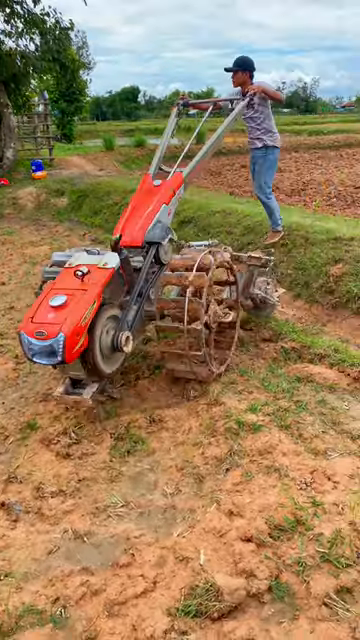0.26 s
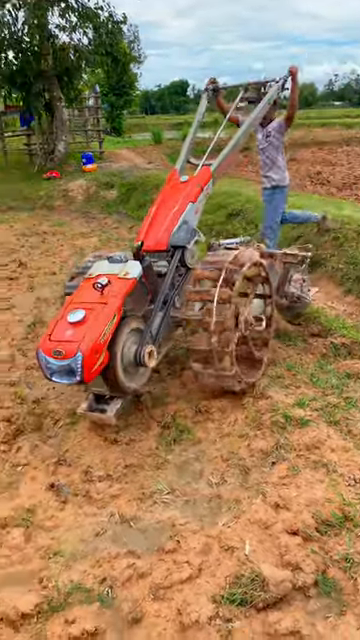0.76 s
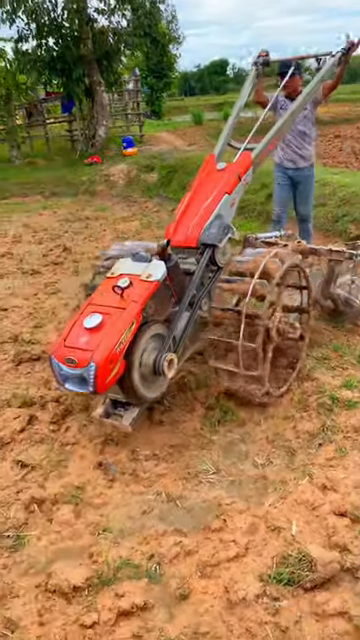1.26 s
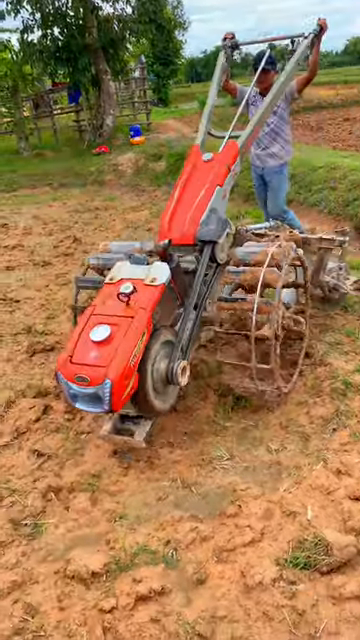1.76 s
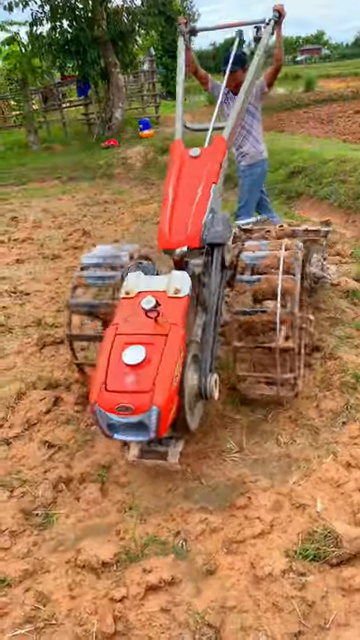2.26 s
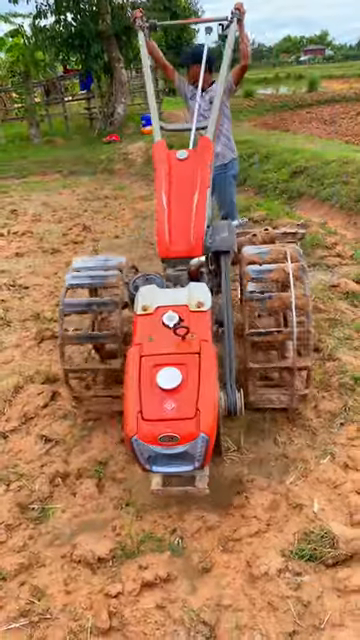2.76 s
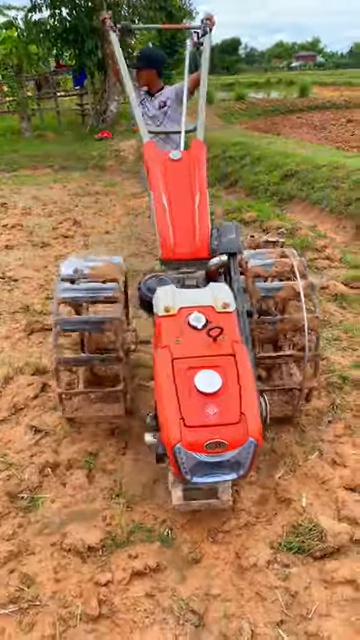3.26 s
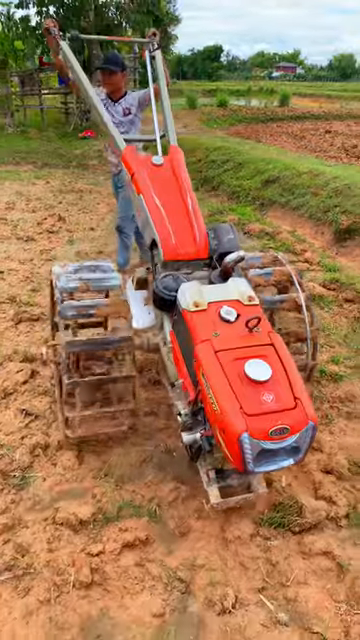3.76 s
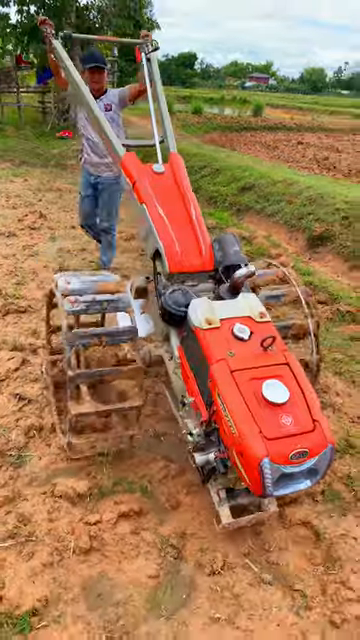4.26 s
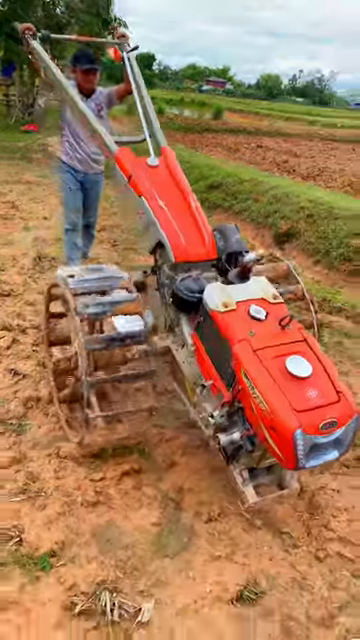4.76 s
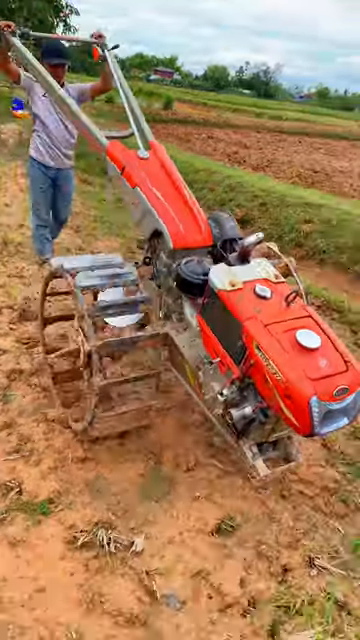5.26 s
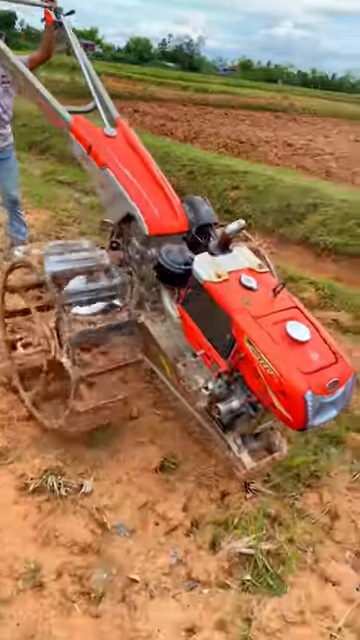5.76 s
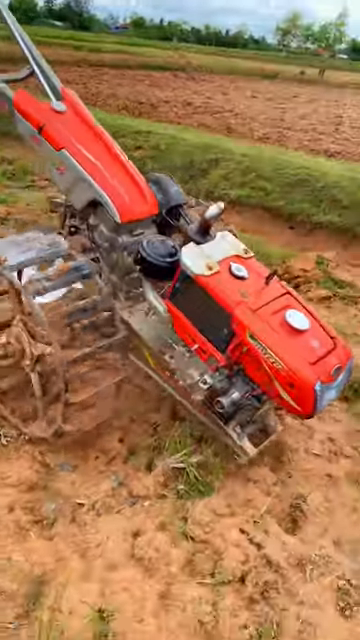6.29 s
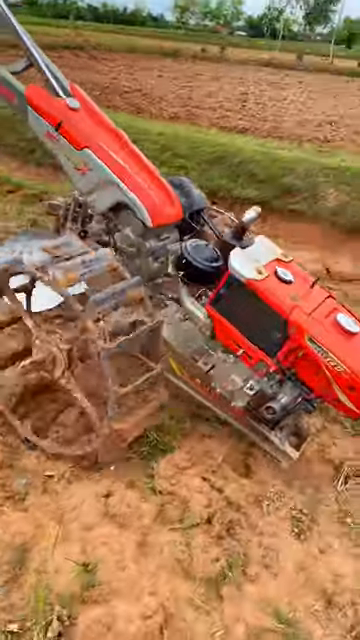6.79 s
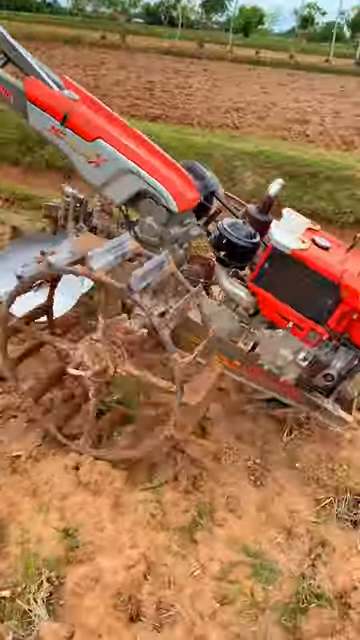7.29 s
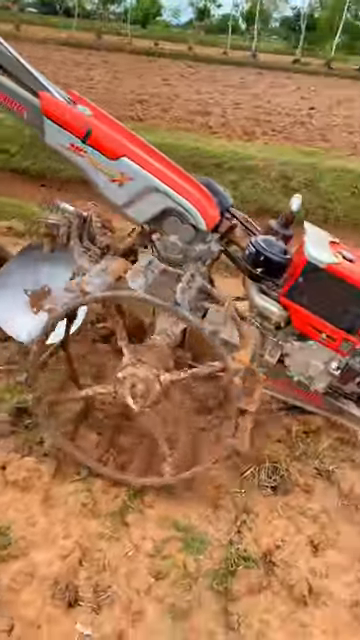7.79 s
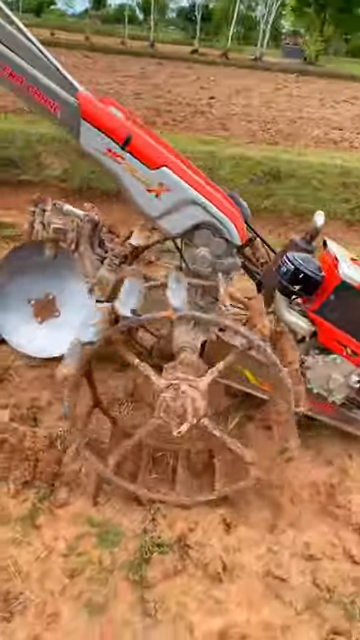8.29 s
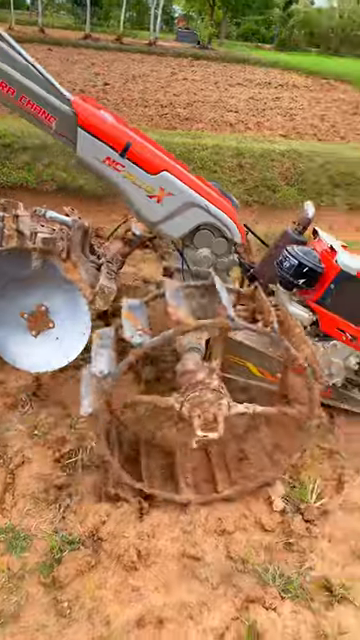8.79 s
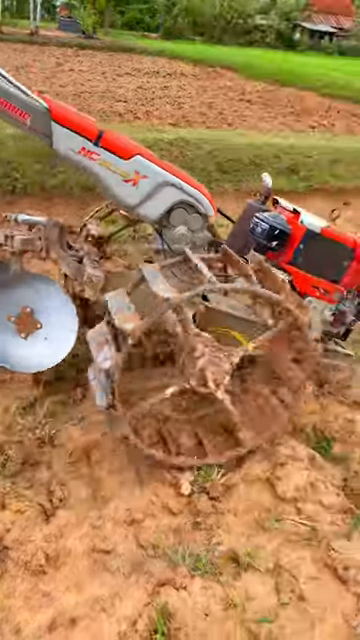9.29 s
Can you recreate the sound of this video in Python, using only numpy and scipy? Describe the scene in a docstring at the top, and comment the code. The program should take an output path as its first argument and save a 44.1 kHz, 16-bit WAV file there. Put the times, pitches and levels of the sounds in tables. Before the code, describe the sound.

A single-cylinder diesel walking tractor chugs at slow idle with rattling gears and thudding iron wheels, then revs up into fast hammering close by.

```python
"""A single-cylinder diesel walking tractor idles across a field, then revs up from about 4.7 s as it passes close by.
Each four-stroke cycle is a knock, an exhaust chuff and boom, an intake gulp and pop, and two valve ticks:
noise bursts and decaying sines timed by the crank. Gear teeth rattle at idle and fade at speed.
A thin whine swells near 1.5 s. Iron cage wheels thud and grind through clods: filtered grains, with short low pops.
The intake hum grows with the rev-up, its deep drone near top speed. Two microphone ports hear it in the open."""
import sys
import numpy as np
from scipy import signal
from scipy.fft import rfft, irfft, next_fast_len
from scipy.io import wavfile

SR = 44100
rng = np.random.default_rng(int(sys.argv[2]) if len(sys.argv) > 2 else 0)


def to_wav(s):
    """Save 16-bit WAV."""
    ch = np.atleast_2d(s).T  # columns
    pcm = np.round(np.clip(ch, -1, 1) * 32767)  # PCM
    wavfile.write(sys.argv[1], SR, pcm.astype(np.int16))


N = 420713
TIME_S = np.arange(N) / SR

# cycle_share: fraction of the cycle after firing. relative_db: scaled by a further level.
# engine speed: time_s, firings_per_s
SPEED = [(0.0, 6.795), (0.44, 6.882), (1.54, 7.059), (2.32, 6.894), (3.72, 6.887), (3.8, 6.702),
         (4.67, 6.761), (5.02, 7.195), (5.25, 7.676), (5.88, 10.27), (5.9, 10.623), (6.29, 11.438),
         (6.57, 11.51), (6.73, 12.213), (7.25, 12.647), (7.72, 12.811), (8.69, 12.604), (9.54, 12.603)]
FIRST_FIRING_S = 0.0183
# knock strength and colour: time_s, level_db, centre_hz
KNOCK_LOAD = [(0, -21.5, 1520), (.9, -20.5, 1840), (1.7, -17.5, 1880), (2.4, -19.5, 1520), (2.9, -17, 1590),
              (3.48, -19, 1920), (3.65, -16.5, 1580), (4.5, -18.5, 1490), (4.8, -12, 1570),
              (5.2, -14, 1530), (5.55, -15.5, 1530), (6.1, -11.5, 1760), (6.4, -18.5, 1690),
              (6.55, -13, 1750), (7.3, -15, 1780), (7.75, -19.5, 1700), (8.5, -19.5, 1920),
              (9.54, -18.5, 1780)]
# bangs harder or softer than the load curve: time_s, extra_db
ACCENTS = [(.02, 2.5), (.46, 2), (.6, -3), (.75, 2), (1.03, 2.5), (1.18, 0.5), (1.32, -2.5), (1.46, 1.5),
           (1.75, 0.5), (2.03, -2), (3.34, 2), (3.48, 4), (4.22, 2), (4.37, 2), (4.81, 1.5), (5.09, 0),
           (5.22, 3.5), (5.35, -1), (5.47, -1), (5.59, -2), (5.69, 0), (5.8, -2), (6.17, 0.5), (6.52, 2.5),
           (6.61, 1.5), (7.26, 2.5), (7.34, 3), (7.65, -4), (7.73, -1), (7.88, -4), (8.51, 2.5),
           (8.83, -3.5), (8.99, 2.5), (9.23, -3.5)]
# block, head and cover modes: mode_hz, width_hz, relative_db
BLOCK_MODES = [(714, 98, 1), (916.5, 66, -1.5), (1170, 300, -3.5), (1388, 79, 1), (1618, 61, -0.5),
               (1767, 40, -2.5), (1936, 140, 1.5), (2350, 120, -2.5), (3060, 110, 0), (4720, 150, 4)]
# ignition, full combustion, piston slap, rebound: relative_db each
BLOWS_DB = (-6, 0, -1.5, -5)
# crankcase wall flexing: cycle_share, mode_hz, relative_db, rise_s, decay_s
CRANKCASE_MODES = [(.002, 340, -12, 0.0006, 0.0031), (0.0079, 688, -15.5, 0.0018, 0.007),
                   (0.0075, 944, -18.5, 0.00099, 0.0042)]
# combustion crack colour: freq_hz, relative_db
CRACK_COLOUR = [(150, -21), (500, 3), (1000, -16.5), (2000, -11), (3000, 2), (3800, -5.5), (5500, -6.5),
                (8000, -12), (11500, -15.5), (16000, -29)]
CRACK_RISE_S = 0.0022
RING_DB, RASP_DB = -5.5, -3.5  # bang ring and power-stroke rasp, relative to the knock
# crankcase and fan turned toward the listener: time_s, gain_db
FLANK = [(0, 4), (2.5, 3), (4.3, 3), (5, 4.5), (6, 11), (6.7, 11), (7.25, 12), (7.9, 11), (9.54, 7)]
# engine breathing: time_s, exhaust_db, intake_db
EFFORT = [(0, -29, -59), (.8, -33.5, -55), (2.2, -29, -43), (3.25, -40, -23), (3.7, -30, -36),
          (4.55, -28, -23), (4.87, -16.5, -48), (5.2, -23, -24), (5.5, -16, -38), (5.85, -14.5, -28),
          (6.05, -17, -22), (6.38, -31, -20), (6.72, -16.5, -22), (7, -26, -18), (7.3, -28, -16),
          (7.76, -32, -14), (9.54, -29.5, -18)]
# exhaust jet colour: freq_hz, relative_db
CHUFF_COLOUR = [(100, 0), (400, 11.5), (750, 7.5), (1500, 4.5), (2200, 1.5), (3000, 5), (3800, -4),
                (5500, -8.5), (8000, -4.5), (11500, -15.5), (16000, -29)]
# muffler boom strength: time_s, level_db
BOOM_LEVEL = [(0, -35), (.8, -27), (2.45, -29), (2.66, -23.5), (3.38, -22.5), (3.55, -25), (3.8, -26),
              (3.97, -22), (4.4, -25), (4.56, -22.5), (5, -20), (5.26, -25.5), (5.39, -18.5), (5.51, -13.5),
              (5.62, -19.5), (5.72, -12), (5.82, -9.5), (5.92, -11.5), (6.1, -13), (6.37, -14.5),
              (6.45, -21), (6.72, -26), (7, -21), (7.3, -29), (7.76, -30), (9.54, -26)]
# muffler air columns: cycle_share, mode_hz, relative_db, rise_s, decay_s
MUFFLER_MODES = [(0.316, 79.8, 4, 0.019, 0.0057), (0.312, 120, -13, 0.0063, 0.0099),
                 (0.337, 53.4, -13.5, 0.014, 0.0089), (0.28, 280, -11, 0.002, 0.032)]
# exhaust shield rings: ring_hz, relative_db
SHIELD_RINGS = [(2200, 8), (3000, 4.5), (3900, -14), (5400, -16), (6400, -19)]
# intake rush colour: freq_hz, relative_db
GULP_COLOUR = [(200, 12.5), (450, 6), (750, 7.5), (1150, 8), (1600, -6), (3000, -8), (8000, -29)]
# hiss past the open intake valve: freq_hz, relative_db
SUCTION_COLOUR = [(500, 6), (1200, 0), (2800, 10), (4000, 5), (5500, 4), (8000, -24), (16000, -27)]
# intake pipe pop at valve opening: cycle_share, mode_hz, relative_db, rise_s, decay_s
INTAKE_MODES = [(.548, 323, 6.5, 0.0042, 0.0014), (.525, 191, -10.5, 0.0025, 0.032),
                (0.52, 400, -11.5, 0.0026, 0.051)]
# intake hum after valve closing: cycle_share, mode_hz, relative_db, rise_s, decay_s
HUM_MODES = [(.833, 149.8, -1.3, .0032, .056), (.85, 291.5, -5, .0019, .033), (.815, 256, -4, .0011, .0102),
             (.83, 334, -13, .002, .04), (.81, 415, -12, .002, .024)]
# air cleaner drone: cycle_share, mode_hz, relative_db, rise_s, decay_s
DRONE_MODES = [(.514, 83, 0.26, 0.0071, 0.027)]
# hum strength and timing unevenness: time_s, level_db, scatter_s
HUM_LEVEL = [(0, -52, 0.0019), (4.5, -38, .002), (5.4, -32, 0.0016), (6, -16, 0.0016), (6.6, -18.5, 0.0017),
             (6.9, -21.5, 0.0017), (7.3, -15.5, 0.00018), (7.76, -15, 0.00013), (9.54, -17, 0.0001)]
DRONE_FROM_PER_S, DRONE_FULL_PER_S = 11.5, 12.6  # firings per s
# loose-part clatter colour: freq_hz, relative_db
CLATTER_COLOUR = [(100, -55), (500, -3), (780, -2.5), (910, 1.5), (1050, 4), (1700, -1), (2100, 4.5),
                  (2650, -2.5), (3700, -16), (5200, -22), (7000, -12), (11500, -20), (16000, -29)]
CLATTER_DB, CLATTER_DB_PER_KNOCK_DB, REFERENCE_KNOCK_DB = -27.5, 0.67, -17
CLATTER_BETWEEN = .48  # steady gain between power strokes
JOLT_UNEVEN_DB = 2  # spread from one power stroke to the next
# guards, rods, brackets: ring_hz, relative_db
FITTING_RINGS = [(750, -1.5), (950, 1.5), (1400, 6), (1900, 0.5), (2700, 5.5), (3200, -2.5), (3800, -7),
                 (5500, -6)]
CLINKS_PER_S = 14  # per fitting
# valves snapping shut: cycle_share, level_db, decay_s
VALVES = [(.475, -32, 0.0063), (0.765, -29, 0.0041)]
# valve tick colour: freq_hz, relative_db
TICK_COLOUR = [(400, 19.5), (1000, 20), (3000, 4), (5000, 9), (7000, 7), (10000, 8), (12000, 4),
               (16000, -7)]
# rocker cover tapped at intake opening: cycle_share, mode_hz, relative_db, rise_s, decay_s
ROCKER_MODES = [(.527, 900, -31, 0.00068, 0.00093), (.527, 1130, -24.5, 0.0003, 0.0021),
                (.53, 765, -30, 0.00079, 0.004)]
# gear rattle colour: freq_hz, relative_db
GEAR_COLOUR = [(1000, 11), (3500, -1.5), (6000, 1), (8500, 2), (9900, 4.5), (10180, 7), (10500, -1),
               (11600, 5.5), (12600, 3), (16000, -7)]
# rattle level, firings per s where it starts to fade, dB lost per further firing per s
RATTLE_DB, TIGHT_PER_S, RATTLE_FADE_DB = -27.5, 10.53, 13
# faint thin whine: peak_s, gaussian_sigma_s, level_db
WHINE = (1.5, .5, -48)
# singing thin panels: mode_hz, width_hz, level_db
PANEL_MODES = [(900, 54, -40.5), (2590, 95, -42.5)]
# wheels striking clods: start_s, peak_db, centre_hz
CLODS = [(0.128, -13, 80.7), (0.166, -12, 143), (0.365, -24, 163), (1.272, -15, 80), (1.347, -19, 95),
         (1.819, -10, 81), (1.848, -19, 80.7), (2.15, -16, 182), (2.37, -18, 110), (2.304, -13, 159),
         (2.483, -15, 201), (2.903, -28, 870), (3.08, -19, 96.9), (3.191, -8, 844), (3.219, -29, 89),
         (3.29, -22, 102), (3.329, -22, 83.4), (4.25, -32, 98.5), (4.366, -20, 80.7), (6.348, -10.5, 142),
         (6.626, -7, 235), (6.66, -12.5, 278), (7.346, -13, 151), (7.965, -8.5, 72)]
# wheels churning soil: time_s, level_db
SOIL_LEVEL = [(0, -27), (.6, -30.5), (1.3, -27), (1.6, -29.5), (2.15, -25), (2.5, -32.5), (3.25, -25),
              (3.7, -32.5), (4.3, -27), (4.5, -25), (4.78, -29), (5.5, -32.5), (6.1, -28.5), (6.62, -24.5),
              (6.8, -40), (8.1, -36), (8.33, -29), (8.5, -33), (9.54, -36)]
# churned soil colour: freq_hz, relative_db
EARTH_COLOUR = [(20, -18), (55, 1.5), (100, 7), (170, 1), (250, -2), (450, -9.5), (800, -22.5),
                (1500, -14.5), (5000, -47)]
# slats crumbling crust: start_s, length_s, relative_db
CRUMBLES = [(0.1, 0.1, -26.5), (0.366, 0.035, -32), (0.653, 0.048, -30), (1.055, 0.2, -30),
            (1.506, 0.39, -36), (1.763, 0.058, -30), (1.9, 0.36, -32.5), (2.322, 0.037, -31),
            (2.573, 0.26, -30.5), (2.897, 0.019, -18.5), (3.063, 0.035, -23.5), (3.172, 0.18, -23),
            (3.508, 0.026, -29), (3.917, .22, -29.5), (4.24, 0.082, -26)]
# crumbling crust colour: freq_hz, relative_db
CRUMBLE_COLOUR = [(60, -24), (200, -5.5), (400, 1.5), (650, -0.5), (1000, -1.5), (1600, -15), (5000, -38)]
CRUMBLE_RISE_S, CRUMBLE_DECAY_S = 0.0053, 0.021
# frame shudder as a wheel drops into a rut: start_s, relative_db
JOLTS = [(.12, -44), (.27, -32), (1.03, -37), (1.26, -29), (1.5, -36), (1.79, -33), (2.12, -21.5),
         (3.93, -34), (4.23, -23), (4.33, -23), (4.54, -29), (4.72, -48), (5.75, -23), (7.02, -40),
         (7.35, -29), (7.92, -25), (8.22, -25)]
JOLT_RISE_S, JOLT_DECAY_S = 0.036, 0.059
# frame rumble colour: freq_hz, relative_db
RUMBLE_COLOUR = [(10, -30), (28, -29), (48, -7), (75, -13), (130, -20), (400, -17), (2000, -65)]
# short low pops: clods snapping, and the low body of two hard knocks near 4.2-4.4 s:
# start_s, relative_db, base_hz (scaled by the falling pitch)
LOW_POPS = [(.102, -17, 500), (.371, -19, 486), (.4, -17, 730), (.448, -16, 900), (.677, -18, 725),
            (.705, -24, 950), (1.163, -24, 576), (1.222, -22, 560), (1.278, -16, 654), (1.773, -19, 1130),
            (1.823, -11.5, 400), (2.157, -18, 557), (2.181, -15, 375), (3.09, -16, 605),
            (3.267, -12.5, 880), (4.222, -15, 613), (4.373, -17, 546), (6.63, -29, 487)]
# wheel grinding into packing soil: start_s, length_s, level_db, from_hz, to_hz
GRINDS = [(1.15, 0.14, -47, 260, 617), (2.037, 0.2, -31, 168, 418), (3.08, 0.26, -45, 258, 800),
          (5.85, 0.4, -31, 190, 334), (6.3, 0.43, -26, 137, 270), (6.594, 0.115, -26.5, 225, 290),
          (6.59, 0.14, -29, 360, 440), (6.753, 0.62, -27, 274, 312)]
# fan hiss colour: freq_hz, relative_db
FAN_COLOUR = [(250, -5), (600, 2), (1100, 12), (3000, 1.5), (4400, 0.5), (5300, 2), (6300, -7), (8000, -11),
              (11500, -8.5), (16000, -28)]
# inter-port phase: freq_hz, left_lead_rad
PORT_PHASE = [(100, 0), (2000, .1), (3400, .85), (5200, .3), (6000, 1.6), (6600, 2.9), (7900, 3.35),
              (9000, 4.9), (9800, 6.2), (11000, 6.35), (12000, 8), (12600, 9.2), (14200, 9.55),
              (15500, 12.2)]
# inter-port likeness: freq_hz, likeness_0_to_1
PORT_LIKENESS = [(250, 0.88), (550, 0.74), (900, 0.94), (2000, 0.91), (2500, 0.74), (4300, 0.49),
                 (5300, 0.86), (6100, 0.95), (7200, 1), (8700, 1), (10300, 0.92), (12200, 0.78),
                 (13300, .98), (15000, 0.71)]
# inter-port balance: freq_hz, left_minus_right_db
PORT_BALANCE = [(100, 0), (300, -.8), (700, 2.4), (1300, 2.4), (2400, -1.3), (5000, 0)]
EDGE_HZ = 15850  # upper band limit


def knock(crack_db=-9, tail_db=-15, focus_hz=480, slap_s=0.0022, low_hz=1200, wander_hz=35, case_db=0):
    """Each firing bangs the block and flexes the crankcase; the block buzzes on through the power stroke."""
    fire_s = moments(0)
    wander = rng.standard_normal(len(fire_s))
    fire_db = np.interp(fire_s, TIME_S, along(KNOCK_LOAD))
    for accent_s, extra_db in ACCENTS:
        fire_db[np.argmin(abs(fire_s - accent_s))] += extra_db
    centre_hz = np.interp(fire_s, TIME_S, along(KNOCK_LOAD, column=2)) + wander_hz * wander
    # each bang favours modes near its centre; low modes radiate from the flank
    flank = np.interp(fire_s, TIME_S, level(FLANK))
    weights = []
    for hz, _, mode_db in BLOCK_MODES:
        facing = flank if hz < low_hz else 1
        weights.append(amp(mode_db) * facing / (1 + ((hz - centre_hz) / focus_hz) ** 2))
    weights = np.array(weights)
    weights /= np.linalg.norm(weights, axis=0)

    last = latest(fire_s)
    cycles_since_fire = (TIME_S - fire_s[last]) * along(SPEED)
    buzz = amp(tail_db) * level(KNOCK_LOAD) * swell(cycles_since_fire, rise=0.11, decay=0.32)
    case_gain = amp(case_db) * level(KNOCK_LOAD) * np.sqrt(level(FLANK))
    ring = pulsed_modes(CRANKCASE_MODES, case_gain, uneven_db=0.5)
    for start_s, bang_db, shares in zip(fire_s, fire_db, weights.T):
        add(ring, start_s, amp(RING_DB + bang_db) * bang(shares, slap_s))
    for weight, (hz, width_hz, _) in zip(weights, BLOCK_MODES):
        ring += resonate(weight[last] * buzz * grit(1500, 0.53), hz, 2.3 * width_hz)
    t = np.arange(SR // 8) / SR
    blow = strike(fire_s, amp(fire_db), swell(t, CRACK_RISE_S, decay=0.0095)) + amp(RASP_DB) * buzz
    return ring + amp(crack_db) * coloured(blow * grit(12000, 0.24), CRACK_COLOUR)


def bang(weights, gap_s, uneven_db=1.1, detune=0.022):
    """Ignition, combustion, piston slap and rebound ring the block modes; rms 1."""
    t, out = np.arange(SR // 25) / SR, np.zeros(SR // 25)
    for k, (weight, (hz, width_hz, _)) in enumerate(zip(weights, BLOCK_MODES)):
        envelope = (-1) ** k * weight * swell(t, rise=0.0002, decay=1.55 / (np.pi * width_hz))
        for blows_before, blow_db in enumerate(BLOWS_DB):
            late, strength, off = rng.standard_normal(3)
            tone = np.sin(2 * np.pi * hz * (1 + detune * off) * t)
            start_s = gap_s * blows_before * (1 + .12 * late)
            add(out, start_s, amp(blow_db + uneven_db * strength) * envelope * tone)
    return unit(out)


def chuff(jet_db=0.0, wash_db=-11):
    """The exhaust valve cracks open on a short turbulent jet, over a weaker, slower wash of gas."""
    jet = bursts(0.245, rise=0.004, decay=0.0055, uneven_db=1.5)
    wash = amp(wash_db) * bursts(0.14, rise=0.011, decay=0.028, uneven_db=3.0)
    return amp(jet_db) * level(EFFORT) * coloured((jet + wash) * grit(7000, 1.0), CHUFF_COLOUR)


def muffler():
    """Each blowdown rings the muffler's air columns."""
    return pulsed_modes(MUFFLER_MODES, level(BOOM_LEVEL), uneven_db=0.0)


def shield(rattle_db=-12, share=0.26, spread=.03, decay_s=0.0025, uneven_db=0.0, count=6):
    """Each blowdown shakes the exhaust shield: a few hard taps, each on different rings."""
    t, out = np.arange(SR // 40) / SR, np.zeros(N)
    force, speed = level(EFFORT), along(SPEED)
    low_hz, high_hz = SHIELD_RINGS[0][0], SHIELD_RINGS[-1][0]
    for s in moments(share):
        size = np.interp(s, TIME_S, force) * amp(rattle_db + uneven_db * rng.standard_normal())
        for late_s in spread * rng.exponential(1.5, count) / np.interp(s, TIME_S, speed):
            hz = low_hz * (high_hz / low_hz) ** rng.random(size=3)
            tones = amp(read(SHIELD_RINGS, hz)) @ np.sin(2 * np.pi * hz[:, None] * t)
            add(out, s + late_s, size * swell(t, rise=0.0007, decay=decay_s) * tones)
    return out


def gulp(rush_db=-4, hiss_db=-36):
    """Air rushes into the cylinder as the intake valve opens, then hisses past it."""
    rush = bursts(0.492, rise=0.00097, decay=0.012, uneven_db=2.5) * grit(12000, 0.82)
    hiss = bursts(0.563, rise=0.002, decay=0.006, uneven_db=6.5) * grit(17000, 0.72)
    rush = amp(rush_db) * level(EFFORT, column=2) * coloured(rush, GULP_COLOUR)
    return rush + amp(hiss_db) * np.sqrt(level(FLANK)) * coloured(hiss, SUCTION_COLOUR)


def intake_pipe():
    """The pipe pops at valve opening and hums after closing; the air cleaner drones near top speed."""
    pop = pulsed_modes(INTAKE_MODES, level(EFFORT, column=2), uneven_db=0.1, scatter_s=.00005)
    hum_gain = level(HUM_LEVEL)
    drone_gain = hum_gain * np.interp(along(SPEED), [DRONE_FROM_PER_S, DRONE_FULL_PER_S], [0, 1])
    drone = pulsed_modes(DRONE_MODES, drone_gain, uneven_db=0.5)
    scatter_s = abs(along(HUM_LEVEL, column=2))
    return pop + drone + pulsed_modes(HUM_MODES, hum_gain, uneven_db=1.0, scatter_s=scatter_s)


def clatter(throb=0.95, second_db=-8, dry_db=-7, ring_db=-5):
    """Loose parts jolted twice a cycle ring the block and its fittings."""
    first = throb * bursts(0.037, rise=0.0042, decay=0.03, uneven_db=JOLT_UNEVEN_DB)
    second = amp(second_db) * bursts(0.65, rise=0.0016, decay=0.0048, uneven_db=0.5)
    jolts = CLATTER_BETWEEN + first + second
    # separate impacts per mode; 1 / hz favours the low ones
    ringing = sum(amp(db) / hz * resonate(grit(260, 2.0), hz, width_hz) for hz, width_hz, db in BLOCK_MODES)
    shaking = amp(CLATTER_DB + CLATTER_DB_PER_KNOCK_DB * (along(KNOCK_LOAD) - REFERENCE_KNOCK_DB))
    dry_hits = amp(dry_db) * coloured(grit(600, 0.83), CLATTER_COLOUR)
    return thin(shaking * jolts * (dry_hits + amp(ring_db) * unit(ringing) + clinks()), edge_hz=527)


def clinks(count=36, clink_db=-3.5, spread_db=2.1, width_hz=55):
    """Many small fittings, each with its own short ring, knocked at random."""
    pitches_hz = np.geomspace(FITTING_RINGS[0][0], FITTING_RINGS[-1][0], count)
    pitches_hz = pitches_hz * (1 + 0.012 * rng.standard_normal(count))
    hits, out = CLINKS_PER_S * N // SR, np.zeros(N)
    for hz in pitches_hz:
        taps = np.zeros(N)
        taps[rng.integers(0, N, hits)] = amp(spread_db * np.minimum(rng.exponential(1, hits), 4))
        out += amp(read(FITTING_RINGS, hz)) * resonate(taps, hz, width_hz)
    return amp(clink_db) * unit(out)


def valve_ticks():
    """Valves snap onto their seats twice a cycle: noise bursts through a bright ring."""
    ticks = sum(amp(db) * bursts(share, rise=0.0044, decay=decay, uneven_db=3.0) for share, db, decay in VALVES)
    ring = bright_ring(count=60, low_hz=710, high_hz=15060, decay_s=0.0016)
    return coloured(signal.oaconvolve(ticks * grit(9000, 0.25), ring)[:N], TICK_COLOUR)


def rocker_cover():
    """The intake valve's opening taps the cover into a brief ring."""
    return pulsed_modes(ROCKER_MODES, np.sqrt(level(FLANK)), uneven_db=2.5, scatter_s=0.00013)


def gears(click_db=-4, ring_db=-3):
    """Power strokes jerk slack gear teeth into chatter, with an added bright ring; drive at speed pulls them tight."""
    backlash = bursts(0.087, rise=0.0013, decay=0.0066, uneven_db=1.0)
    backlash = backlash + bursts(0.14, rise=0.0083, decay=0.014, uneven_db=3.0)
    slack = amp(RATTLE_DB - RATTLE_FADE_DB * np.maximum(along(SPEED) - TIGHT_PER_S, 0))
    clicks = backlash * grit(1100, 1.2)
    ringing = signal.oaconvolve(clicks, bright_ring())[:N]
    return slack * coloured(amp(click_db) * clicks + amp(ring_db) * ringing, GEAR_COLOUR)


def bright_ring(count=44, low_hz=2400, high_hz=12500, decay_s=0.0022):
    """Brief bright ring of many close high modes, added to rattle and ticks; unit energy."""
    t = np.arange(SR // 40) / SR
    hz = np.linspace(low_hz, high_hz, count) + 70 * rng.standard_normal(count)
    turns = hz[:, None] * t + rng.random((count, 1))
    ring = np.exp(-t / decay_s) * np.sin(2 * np.pi * turns).sum(0)
    return ring / np.linalg.norm(ring)


def whine(whine_hz=4500):
    """Noise through two narrow resonances swells and fades once."""
    peak_s, sigma_s, whine_db = WHINE
    tone = resonate(resonate(rng.standard_normal(N), whine_hz, 150), whine_hz, 220)
    return amp(whine_db) * np.exp(-((TIME_S - peak_s) / sigma_s) ** 2 / 2) * unit(tone)


def panels(throb=1.2):
    """Thin panels ring under steady shaking that grows at each power stroke."""
    shake = 5 + throb * bursts(0.073, rise=.006, decay=0.034, uneven_db=6.0)
    shake = shake * lumps(per_s=2.75, depth_db=0.5)
    out = np.zeros(N)
    for hz, width_hz, db in PANEL_MODES:
        out += amp(db) * unit(resonate(resonate(shake * grit(400, 1.7), hz, width_hz), hz, 5 * width_hz))
    return out


def clod_thuds(thud_db=-6):
    """Iron slats thud on clods: short noise pushes around one low pitch."""
    out, t = np.zeros(N), np.arange(SR // 5) / SR
    for start_s, peak_db, hz in CLODS:
        push = rng.standard_normal(len(t)) * swell(t, rise=0.00097, decay=0.016)
        colour = [(30, -18), (hz / 3, -4), (hz, 0), (hz * 2.13, -9), (hz * 8, -30), (16000, -55)]
        thud = coloured(push, colour)
        add(out, start_s, amp(peak_db + thud_db) * 2 * thud / abs(thud).max())
    return out


def low_pops(pop_db=-1, fall=1.48, pop_s=0.00326):
    """Short low pops of falling pitch: clods snapping, and the low body of two hard knocks."""
    out, t = np.zeros(N), np.arange(SR // 30) / SR
    for start_s, db, hz in LOW_POPS:
        turns = np.cumsum(hz * (0.586 + fall * np.exp(-t / pop_s))) / SR
        pop = swell(t, rise=0.0018, decay=pop_s) * np.sin(2 * np.pi * turns)
        add(out, start_s, amp(db + pop_db) * pop)
    return out


def grinding(grind_db=0, width_hz=150):
    """Slats send grains through a soil hollow that rises in pitch as it packs."""
    out, grains, pole = np.zeros(N), grit(450, 1.3), np.exp(-np.pi * width_hz / SR)
    for start_s, length_s, db, from_hz, to_hz in GRINDS:
        part = grains[int(start_s * SR):][:int(length_s * SR)]
        u = np.linspace(0, 1, len(part))
        # shift to 0 Hz, low-pass, shift back: a gliding resonance
        turn = np.exp(2j * np.pi * np.cumsum(from_hz * (to_hz / from_hz) ** u) / SR)
        hollow = (turn * signal.lfilter([1], np.poly([pole, pole]), part / turn)).real
        add(out, start_s, amp(db + grind_db) * unit(hollow * np.sqrt(abs(np.sin(np.pi * u ** 0.6)))))
    return out


def churned_soil():
    """Wheels churn soil: sparse uneven grains of dull colour."""
    return level(SOIL_LEVEL) * lumps(per_s=11, depth_db=2.5) * coloured(grit(1100, 3.26), EARTH_COLOUR)


def crumbling_crust(crust_db=-2, floor_db=-47):
    """Slats crumble dry crust: gated grains over a faint steady crunch."""
    gain = amp(floor_db) * level(FLANK)
    for start_s, length_s, db in CRUMBLES:
        rise = np.clip((TIME_S - start_s) / CRUMBLE_RISE_S, 0, 1)
        fade = np.exp(-np.maximum(TIME_S - start_s - length_s, 0) / CRUMBLE_DECAY_S)
        gain = gain + amp(db) * rise * fade
    return amp(crust_db) * gain * coloured(grit(1200, 1.4), CRUMBLE_COLOUR)


def frame_shudder(rumble_db=-6, rolling_db=-40):
    """The frame rumbles as it rolls and shudders in ruts: low noise under slow envelopes."""
    jolt_s, jolt_db = np.transpose(JOLTS)
    jolt = swell(np.arange(SR) / SR, JOLT_RISE_S, JOLT_DECAY_S)
    gain = amp(rolling_db) * np.sqrt(level(FLANK)) + strike(jolt_s, amp(jolt_db), jolt)
    return amp(rumble_db) * gain * unit(coloured(rng.standard_normal(N), RUMBLE_COLOUR, size=8192))


def fan(hiss_db=-42):
    """The cooling fan hisses through the radiator on the flank."""
    return amp(hiss_db) * level(FLANK) * coloured(rng.standard_normal(N), FAN_COLOUR)


def moments(share):
    """Times at which the crank is this share of a cycle past firing."""
    t = np.arange(-.4, N / SR + .4, .001)
    cycles = np.cumsum(np.interp(t, *np.transpose(SPEED))) * (t[1] - t[0])
    cycles -= np.interp(FIRST_FIRING_S, t, cycles)
    return np.interp(np.arange(-1, np.interp(N / SR, t, cycles)) + share, cycles, t)


def latest(s):
    """Index of the latest event at every sample."""
    return np.maximum(np.searchsorted(s, TIME_S) - 1, 0)


def bursts(share, rise, decay, uneven_db):
    """One envelope a cycle, each a little stronger or weaker."""
    s = moments(share)
    last = latest(s)
    strength = amp(uneven_db * rng.standard_normal(len(s)))
    return swell(np.maximum(TIME_S - s[last], 0), rise, decay) * strength[last]


def pulsed_modes(modes, gain, uneven_db, scatter_s=0):
    """One pulse a cycle rings each mode, a little early or late."""
    t, out = np.arange(SR // 4) / SR, np.zeros(N)
    for share, hz, db, rise, decay in modes:
        s = moments(share)
        strength, late = rng.standard_normal((len(s), 2)).T
        sizes = np.interp(s, TIME_S, gain) * amp(db + uneven_db * strength)
        late_s = late * np.interp(s, TIME_S, scatter_s * np.ones(N))
        out += strike(s + late_s, sizes, swell(t, rise, decay) * np.sin(2 * np.pi * hz * t))
    return out


def strike(s, sizes, ring):
    """Plays a ring at each time s."""
    clicks, inside = np.zeros(N), (s >= 0) & (s < (N - 1) / SR)
    clicks[(s[inside] * SR).astype(int)] = sizes[inside]
    return signal.oaconvolve(clicks, ring)[:N]


def add(mix, s, sound):
    """Mixes a sound in at time s."""
    if s >= 0:
        part = mix[int(s * SR):][:len(sound)]
        part += sound[:len(part)]


def swell(age, rise, decay):
    """Envelope that rises to 1 and dies away."""
    shape = (1 - np.exp(-(age / rise) ** 2)) * np.exp(-age / decay)
    return shape / shape.max()


def grit(per_s, spread_db):
    """Random tiny impacts of uneven size, rms 1."""
    size = amp(spread_db * np.minimum(rng.exponential(1, N), 4))
    return unit(rng.standard_normal(N) * size * (rng.random(N) < per_s / SR))


def lumps(per_s, depth_db):
    """Gain that rises and falls by chance."""
    s = np.arange(0, N / SR + 1, 1 / per_s)
    return amp(depth_db * np.interp(TIME_S, s, rng.standard_normal(len(s))))


def resonate(x, hz, width_hz):
    """One mode as a complex pole; white noise keeps its power."""
    pole = np.exp((2j * np.pi * hz - np.pi * width_hz) / SR)
    return signal.lfilter([np.sqrt(2 * (1 - abs(pole) ** 2))], [1, -pole], x + 1e-15).imag


def coloured(x, spectrum, size=2048):
    """Causal minimum-phase filter of unit energy with the given colour."""
    log_gain = read(spectrum, abs(np.fft.fftfreq(size, 1 / SR))) * np.log(10) / 20
    taps = np.fft.ifft(np.exp(np.conj(signal.hilbert(log_gain)))).real
    return signal.oaconvolve(x, taps / np.linalg.norm(taps))[:len(x)]


def thin(x, edge_hz):
    """Small parts radiate little bass: high-pass."""
    return signal.sosfilt(signal.butter(3, edge_hz, "highpass", fs=SR, output="sos"), x)


def along(rows, column=1):
    """One column of a time curve at every sample."""
    rows = np.asarray(rows)
    return np.interp(TIME_S, rows[:, 0], rows[:, column])


def level(rows, column=1):
    """Gain of one dB column at every sample."""
    return amp(along(rows, column))


def read(points, hz):
    """Table joined by straight lines on a log-frequency axis."""
    f, value = np.transpose(points)
    return np.interp(np.log(hz + 1), np.log(f), value)


def amp(db):
    """Decibels to gain."""
    return 10 ** (np.asarray(db) / 20)


def unit(x):
    """Scales to rms 1."""
    return x / np.sqrt(np.mean(x ** 2) + 1e-20)


def scattered_sources():
    """Everything but the pipes, with fresh random draws."""
    engine = knock() + chuff() + shield() + gulp() + clatter() + valve_ticks() + rocker_cover()
    engine = engine + gears() + whine() + panels()
    ground = clod_thuds() + low_pops() + grinding() + churned_soil() + crumbling_crust() + frame_shudder()
    return engine + ground + fan()


def scene():
    """Pipe waves are common to both ports; other sound partly differs; then port phase and balance apply."""
    size = next_fast_len(N + SR // 4)
    hz = np.fft.rfftfreq(size, 1 / SR)
    shared, scattered = (rfft(scattered_sources(), size) for _ in range(2))
    same, side = np.clip(read(PORT_LIKENESS, hz), 0, 1), np.array([[1], [-1]])
    ports = rfft(muffler() + intake_pipe(), size) + np.sqrt((1 + same) / 2) * shared
    ports = ports + 1j * side * np.sqrt((1 - same) / 2) * scattered
    ports *= amp(side * read(PORT_BALANCE, hz) / 2) * np.exp(.5j * side * read(PORT_PHASE, hz))
    return irfft(ports, size)[:, :N]


def record(dry, low_cut_hz=36):
    """Microphones shed the lowest bass, round peaks just under full scale, then limit the band."""
    thinned = signal.sosfilt(signal.butter(4, low_cut_hz, "highpass", fs=SR, output="sos"), dry)
    rounded = thinned / (1 + (thinned / .95) ** 6) ** (1 / 6)
    band_limit = signal.firwin(511, EDGE_HZ, window=("kaiser", 9), fs=SR)
    return signal.oaconvolve(rounded, band_limit[None], "same")


dry = scene()
out = record(dry)
to_wav(out)
```